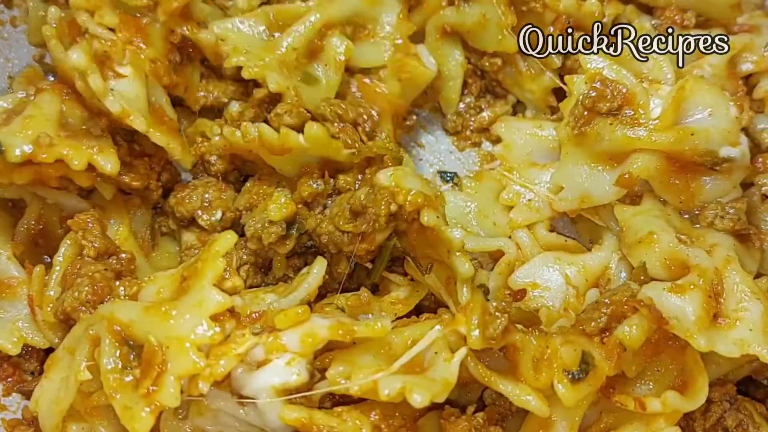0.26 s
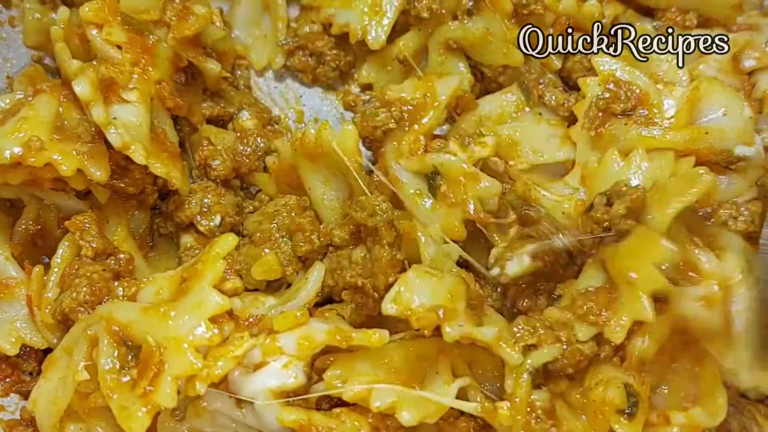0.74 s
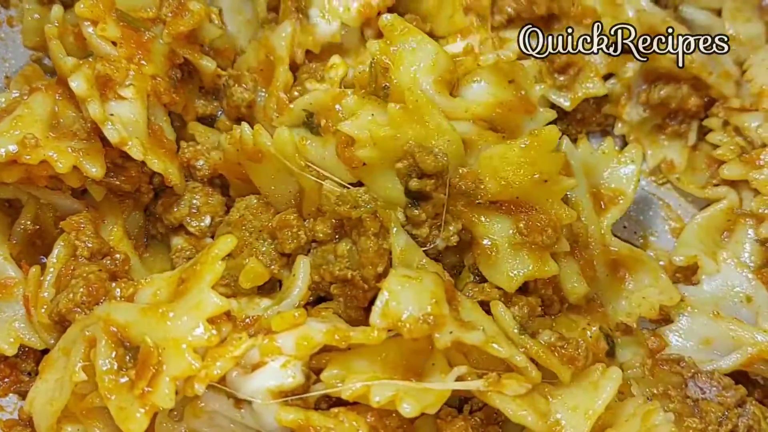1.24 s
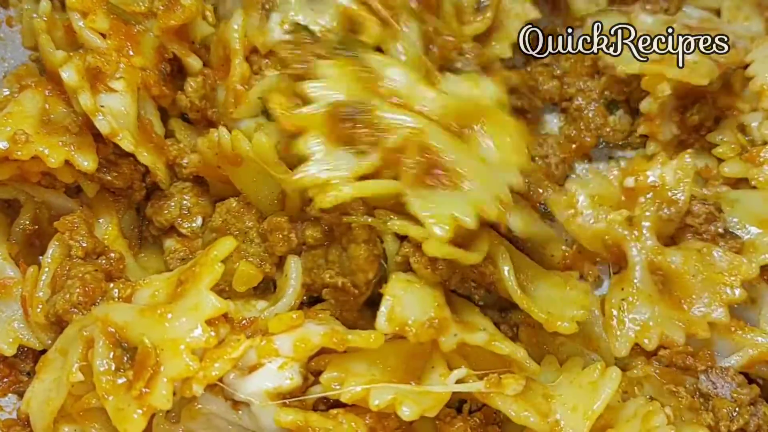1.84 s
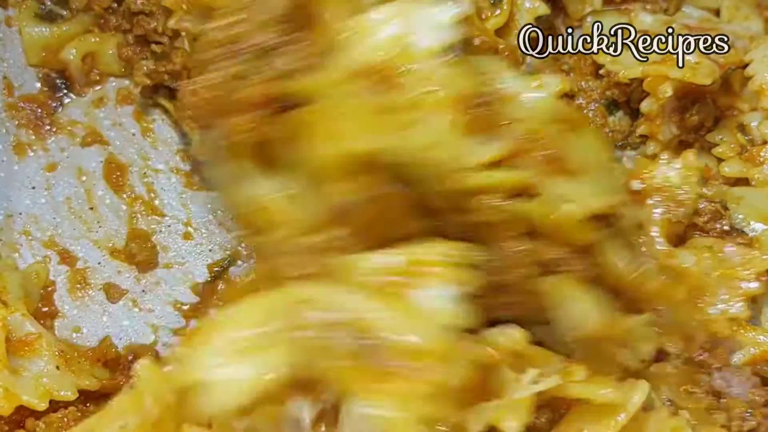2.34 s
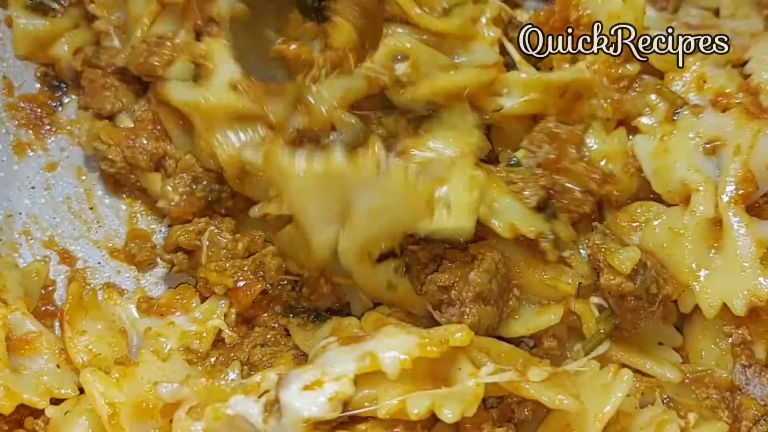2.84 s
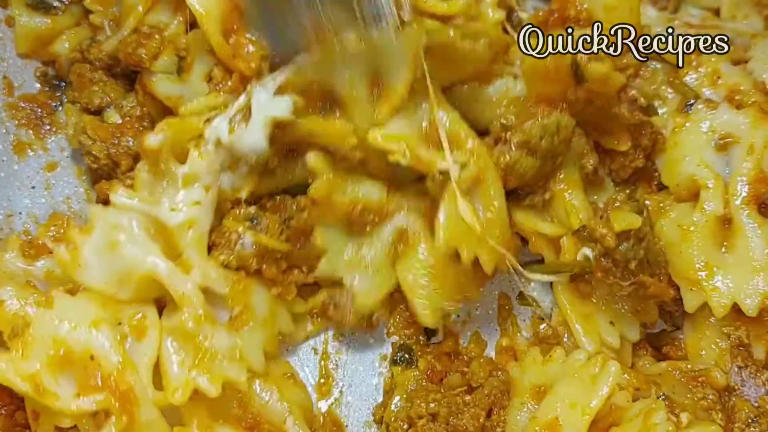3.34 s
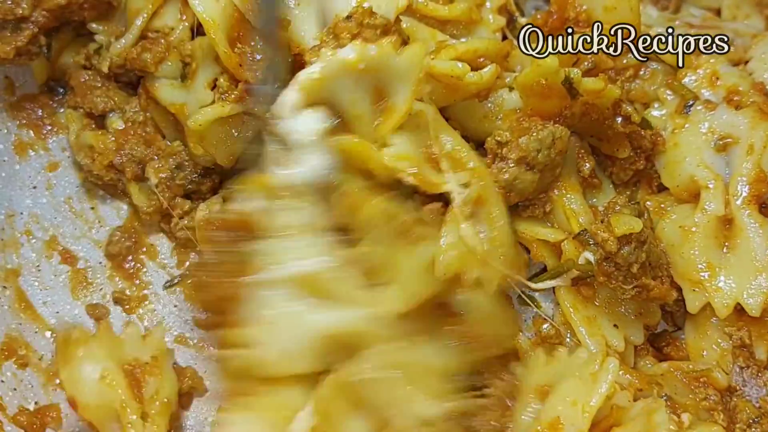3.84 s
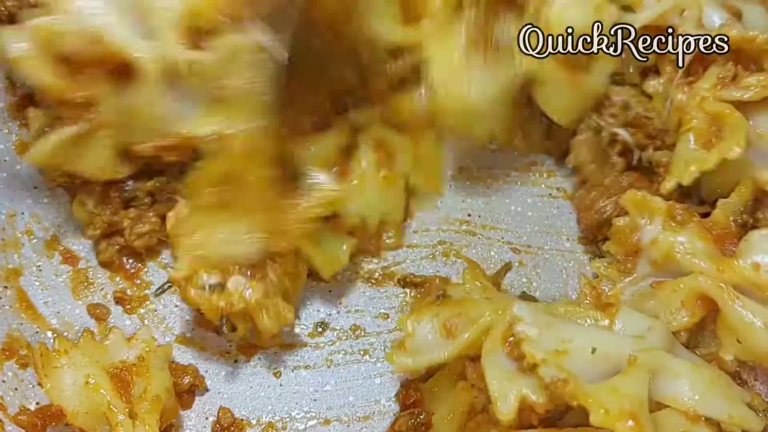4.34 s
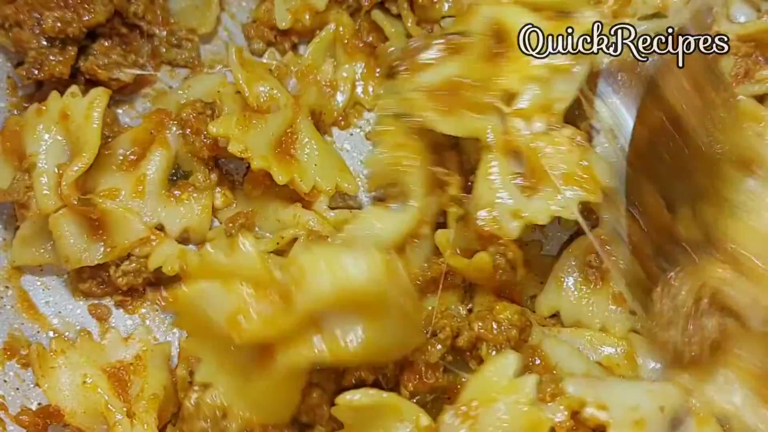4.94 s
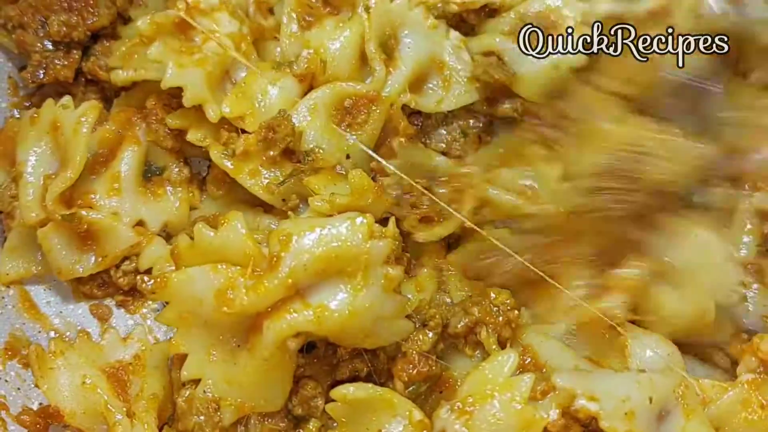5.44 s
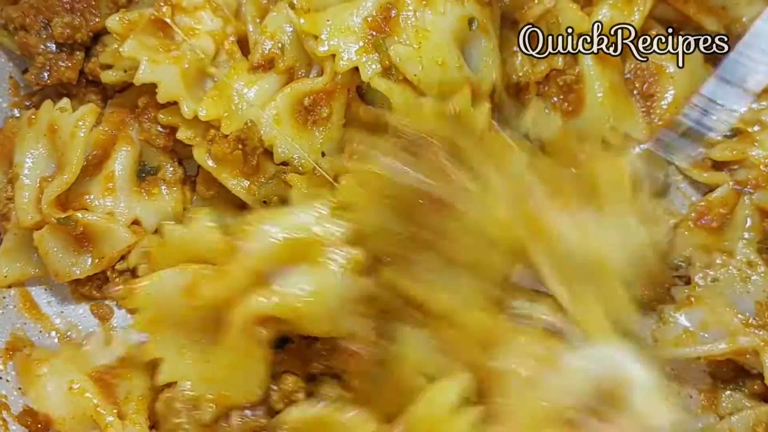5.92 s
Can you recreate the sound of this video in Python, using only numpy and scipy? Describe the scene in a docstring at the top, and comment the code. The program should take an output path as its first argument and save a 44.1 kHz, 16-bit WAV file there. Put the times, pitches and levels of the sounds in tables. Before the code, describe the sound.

Close wet crackling of saucy pasta being stirred, with a few sharp spoon knocks on the pan and birds chirping outside early on.

```python
"""A kitchen, stereo microphone close to a pan where a spoon turns pasta in thick sauce. From the start
the sauce crackles and smacks as tiny bubbles tear open; beyond the open window birds call over insects and
traffic, and a vehicle drones away by 2 s. The spoon knocks the pan ringing at 0.9 s, scrapes and knocks
at 2.2 s, then scrapes lightly. Thin chirps follow at 3 s, a last knock at 4.7 s and more bird calls,
before the sound fades out quickly at 5.6 s."""
import sys
import numpy as np
from scipy import signal
from scipy.fft import rfft, irfft, next_fast_len
from scipy.io import wavfile
from scipy.ndimage import map_coordinates

SR = 44100
rng = np.random.default_rng(int(sys.argv[2]) if len(sys.argv) > 2 else 0)


def digitize_waveform(pressure):
    """Quantize a signal to 16-bit integers and store it at the path in sys.argv[1].

    Rows of a 2-D input are taken as channels; values are limited to [-1, 1].
    """
    field = np.atleast_2d(pressure).T
    bounded = np.clip(field, -1, 1)
    quanta = np.round(bounded * 32767).astype(np.int16)
    wavfile.write(sys.argv[1], SR, quanta)


N = 272538

# Turns of the spoon, close up: (start [s], length [s], crackle [dB], slosh [dB])
STIRS = [(0, 0.12, -62, -77.5), (0.58, .28, -71, -89), (1.335, 0.1, -63, -80), (1.648, 0.14, -63.5, -67),
         (2.226, 0.16, -69.5, -64), (2.643, 0.28, -65.5, -66.5), (3.172, 0.15, -67.5, -71),
         (3.708, 0.38, -72, -87.5), (4.168, 0.25, -66.5, -66.5), (4.634, 0.035, -68.5, -80),
         (4.776, 0.09, -70.5, -66.5), (5.066, 0.13, -69.5, -64.5), (5.475, 0.047, -58, -55.5)]
# Sauce letting go of spoon and pasta: (time [s], level [dB], pitch [Hz], left over right [dB])
SMACKS = [(0.0276, -32.5, 11600, -1), (.0613, -33.5, 8800, -1), (.1391, -38, 11600, 5),
          (.1565, -42.5, 14000, -4), (.1695, -43, 15000, -2), (.188, -39, 11140, 4),
          (.1947, -38, 3500, 4.5), (0.4806, -38, 12010, 2), (.831, -46.5, 8650, 0.5),
          (.8895, -36, 8900, -0.5), (.9767, -39.5, 10500, 6.5), (1.373, -39.5, 9100, 3.5),
          (1.441, -35.5, 5130, 1), (1.4535, -35.5, 11200, 9), (1.6536, -38, 10500, 1),
          (1.6775, -42.5, 11500, 9), (1.771, -37, 12100, 7), (2.1215, -26.5, 10740, 6),
          (2.2374, -38, 12700, 11.5), (2.2798, -39.5, 11330, 10), (2.357, -40.5, 13700, 4),
          (2.372, -42.5, 3987, 1), (2.4182, -39, 11540, 3), (2.4643, -41, 11960, -3.5),
          (2.5047, -44.5, 10100, 2), (2.5222, -42, 12400, -8), (2.6379, -46, 10700, -5),
          (2.663, -40, 14900, -8.5), (2.6743, -38.5, 3600, 3), (2.711, -40.5, 2450, 4),
          (2.735, -39, 4560, 8), (2.766, -45, 2570, 3), (2.8087, -39.5, 5000, -2),
          (3.0946, -45, 14200, 4.5), (3.1819, -42, 3500, 9), (3.188, -40, 12800, 9),
          (3.2313, -42.5, 3870, 9), (3.2555, -43.5, 15280, 8.5), (3.2864, -43.5, 12600, 4),
          (3.3714, -45.5, 10200, 10), (3.598, -50, 3200, 10), (3.7412, -43.5, 13200, 4),
          (3.8611, -43.5, 11290, 0), (3.929, -45, 10800, 2), (3.9853, -45.5, 9700, 5.5),
          (4.0968, -37.5, 11300, 6), (4.153, -43.5, 15000, -1.5), (4.162, -42, 12600, -4.5),
          (4.2587, -42, 11500, 0.5), (4.3345, -44.5, 3230, 10), (4.3963, -41, 14580, 7.5),
          (4.6544, -39, 11000, -4), (4.6555, -45.5, 2700, 4), (4.7072, -40.5, 15500, 7),
          (4.807, -43, 14900, 7), (4.851, -48, 3150, 8), (4.8589, -38.5, 7700, -3),
          (5.017, -47, 10400, 0.5), (5.076, -41.5, 5040, 2), (5.0818, -39.5, 11400, -2.5),
          (5.1103, -40.5, 11800, 0.5), (5.1552, -45, 12400, -4), (5.1835, -42.5, 2470, 3),
          (5.399, -48, 9000, 2), (5.468, -49.5, 10700, -2), (5.4835, -43, 2580, -5), (5.4955, -42, 2490, 6),
          (5.5182, -41, 3430, -2), (5.545, -42, 11300, 7), (5.6029, -46.5, 11370, 4.5)]
def sauce():
    """Stirred sauce crackles and sloshes, never quite at rest; each smack leaves a spray of crackle."""
    rest_db, spray_db, spray_t60 = -79.5, -12, .034
    motion = np.array([stir(s, length) for s, length, _, _ in STIRS])
    crackle, slosh = amp(np.array(STIRS)[:, 2:]).T @ motion
    kicks = np.zeros(N)
    for s, db, _, _ in SMACKS:
        kicks[round(s * SR)] = amp(db + spray_db)
    crackle += amp(rest_db) + signal.lfilter([1], [1, -amp(-60 / spray_t60 / SR)], kicks)
    close = crackle * fizz(12300, spread=.57, uneven_db=4.5, count=9000)
    close += slosh * fizz(3020, spread=.49, uneven_db=3.5, count=6000)
    close += bubbles(*np.transpose(SMACKS), cycles=1.2)
    return close + amp(-12) * from_pan(close[0], lag_s=.0049, wet_db=8)


def stir(start, length, rise_s=.0073, t60=.12):
    """The sauce's motion in one turn: a quick rise, a hold, a decay."""
    t = np.arange(N) / SR - start
    return np.clip(1 + t / rise_s, 0, 1) * amp(-60 * np.clip(t - length, 0, 9) / t60)


def fizz(hz, spread, uneven_db, count):
    """A dense swarm of tiny bubbles, rms 1."""
    when, size = rng.random((count, 2)).T
    detune, side = rng.standard_normal((count, 2)).T
    pitch = np.clip(hz * np.exp(spread * detune), 800, 16000)
    return unit(bubbles(when * N / SR, -uneven_db * np.log(size), pitch, 3 + 3 * side, cycles=.54))


def bubbles(s, db, hz, left_db, cycles):
    """Bubbles tearing open: sines that swell and die in a few cycles, a little later on the right."""
    samples = np.arange(160)
    turns = samples / SR * hz[:, None]
    wave = amp(db)[:, None] * np.sin(2 * np.pi * turns) * turns / cycles * np.exp(1 - turns / cycles)
    ports = []
    for side, late in (1, 0), (-1, rng.random(len(s)) * 24):
        at = np.round(s * SR + late).astype(int)[:, None] + samples
        panned = wave * amp(side * left_db / 2)[:, None]
        ports.append(np.bincount(at.ravel(), panned.ravel(), N)[:N])
    return np.array(ports)


# Spoon on pan, with its bounces: (time [s], strength [dB], low-mode gain [dB], crack gain [dB])
KNOCKS = [(0.906, -5.5, -1, -19.5), (.9125, -11, -6, -25), (.919, -13.5, 5, -23), (2.1768, -23, 5.5, -10),
          (2.212, -32.5, 9, -7), (4.7272, -18, 0, -14.5), (4.7322, -16, -1.5, -16.5),
          (4.7348, -15.5, -5.5, -27)]
# The pan's modes: (frequency [Hz], gain [dB], t60 [s])
PAN_MODES = [(574, -20, 0.069), (747, -16.5, 0.031), (860, -16, 0.0251), (1010, -10.5, 0.019),
             (1100, -13.5, 0.037), (1273, -8.5, 0.035), (1532, -11.5, .03), (1700, -10, 0.019),
             (1940, -3, 0.035), (2087, 3.5, 0.011), (2604, -13, .025), (3000, -14.5, 0.038),
             (3860, -12, 0.012), (4680, -18, 0.018), (5220, -13, 0.011), (6415, -24, .03),
             (7630, -14, 0.0087)]
def knocks(low_hz=1600, crack_t60=.032, rise_s=.00099):
    """Each knock rings the pan's modes over a crack of noise."""
    x, t = np.zeros(N + SR), np.arange(SR // 2) / SR
    for s, db, low_db, crack_db in KNOCKS:
        ring = sum(amp(level + low_db * (hz < low_hz) + rng.normal(0, 1.95) - 60 * t / t60)
                   * np.sin(2 * np.pi * hz * t) for hz, level, t60 in PAN_MODES)
        crack = amp(crack_db - 60 * t / crack_t60) * rng.standard_normal(len(t))
        x[round(s * SR):][:len(t)] += amp(db) * (ring + crack) * (1 - np.exp(-t / rise_s))
    return x[:N]


# Spoon along the pan, one curve a stroke: (time [s], pressure [dB])
STROKES = [
    [(2.116, -54.5), (2.145, -37), (2.162, -33.5), (2.174, -40.5), (2.198, -40.5), (2.212, -31),
     (2.222, -36), (2.236, -59), (2.3, -76)],
    [(2.8, -73.5), (2.83, -59), (2.848, -54.5), (2.87, -55.5), (2.945, -67), (2.97, -72)],
]
# What each stroke shakes out of the pan: (starting ring gain [dB], thud gain [dB])
STROKE_GAINS = [(-22, -11.5), (-30.5, 11.5)]
# The rasp's spectrum: (frequency [Hz], gain [dB])
RASP = [(410, -40), (700, -12), (1000, -9), (1090, -4.5), (1980, -2), (2330, -2), (4120, -10.5),
        (5540, -20.5), (8000, -16), (10400, -38), (17600, -120)]
def scrapes(ring_db_per_s=258, dull_db_per_s=199):
    """Dense grit shakes the loaded pan; as the spoon digs in, the grit dulls and the pan rings more."""
    x = np.zeros(N)
    grit = rng.standard_normal(N) * amp(1.5 * wobble(180))
    shake = lambda level, colour: filtered(level * grit, colour) / np.std(filtered(grit, colour))
    for stroke, (ring_db, thud_db) in zip(STROKES, STROKE_GAINS):
        db, gate = curves(stroke)
        push = gate * amp(db)
        dig_s = np.clip(np.arange(N) / SR - stroke[0][0], 0, .09)
        rasp = shake(push, spectrum(RASP))
        ring = shake(push * amp(ring_db + ring_db_per_s * dig_s), resonances([(571.4, 14, 0)]))
        thud = shake(push * amp(thud_db), lambda f: resonances([(343, 266, 0)])(f) ** 2)
        crisp = shake(push * amp(2.5 - dull_db_per_s * dig_s), resonances([(10860, 18000, 0)]))
        x += rasp + ring + thud + crisp
    return x


# Sound from the pan, louder in the microphone's left port at some pitches: (frequency [Hz], left over right
# [dB])
PAN_PORT_BALANCE = [(500, 1), (1200, 3.5), (2000, 10.5), (3300, 5.5), (10000, 4)]
# Kitchen walls: (frequency [Hz], t60 [s])
KITCHEN_DECAY = [(400, 0.52), (2000, 0.23), (6000, 0.29), (14000, 0.3)]
def from_pan(x, lag_s, wet_db):
    """The short path from pan to microphone, with the kitchen's reverberation."""
    return microphone(x, PAN_PORT_BALANCE, lag_s, KITCHEN_DECAY, wet_db)


# Calls far off in the yard:
# (start [s], length [s], first pitch [Hz], last pitch [Hz], level [dB], decay [dB], pitch jitter [ratio])
CALLS = [(0, 0.07, 3330, 3400, -38.5, 5, 0.03), (0, 0.46, 4160, 3990, -50.5, 21, 0.02),
         (.002, 0.048, 2553, 2606, -26.5, 15.5, 0.01), (0.049, 0.057, 3378, 3670, -31, 10, 0.03),
         (0.081, 0.053, 2300, 2010, -31.5, 14.5, 0.01), (0.097, 0.27, 3470, 3500, -50.5, 11, 0.02),
         (.115, 0.046, 3682, 3790, -39.5, 3.5, .009), (0.118, 0.028, 1970, 1950, -45, 6, 0),
         (.18, 0.064, 2157, 2125, -42.5, 0.5, 0.02), (0.223, 0.048, 2325, 2510, -41, 10, 0.08),
         (0.222, 0.12, 2023, 2000, -44.5, 23, .055), (0.238, 0.22, 2490, 2530, -52, 16, .055),
         (0.488, .12, 2990, 3485, -42.5, -4, 0.03), (0.571, 0.065, 3726, 3874, -40.5, 1, 0),
         (.578, 0.051, 2720, 2465, -36.5, -2, 0.02), (0.614, 0.057, 3850, 3820, -27.5, 9.5, 0),
         (0.619, 0.044, 2230, 1770, -34, 10, 0.02), (.65, 0.29, 2800, 2900, -44.5, 11, 0.07),
         (.66, 0.23, 2024, 2100, -44.5, 8, 0.05), (0.696, 0.16, 3842, 3800, -37.5, 14.5, .009),
         (0.743, 0.042, 2550, 2646, -27.5, 3.5, 0.02), (1.01, 0.14, 7700, 8600, -67, 10, 0.06),
         (1.15, 0.19, 2554, 2514, -52, 0.5, 0.04), (1.189, .12, 2047, 2180, -55.5, -4, 0.08),
         (1.36, 0.064, 2090, 2080, -54.5, -1.5, 0.07), (1.375, 0.039, 2950, 2745, -49, 0, 0.07),
         (1.27, .18, 7200, 8250, -63, 6, 0.06), (1.334, 0.064, 2640, 2680, -38, 16.5, 0.02),
         (1.625, 0.066, 7550, 7950, -83, -17, 0), (2.921, 0.16, 7150, 7260, -65, 5.5, 0.01),
         (5.068, 0.04, 2090, 1926, -46, 6.5, 0.03), (5.09, 0.0427, 3310, 2690, -46, 2, 0),
         (5.1, .16, 1963, 1980, -61, 11, 0.03), (5.117, 0.063, 2610, 2500, -40, 9.5, 0.01),
         (5.209, 0.064, 3510, 2465, -46.5, -6.5, 0.01), (5.244, 0.24, 2930, 2790, -61, 11.5, 0.07),
         (5.29, 0.069, 1905, 2260, -38, 9, 0.02), (5.337, 0.13, 2008, 2050, -60.5, 5, 0.02),
         (5.55, 0.056, 1514, 1556, -65.5, 4.5, .009)]
# One quick chirp: (time [s], pitch [Hz], gain [dB])
CHIRP = [(0, 5450, 8), (.008, 5530, -3), (.014, 6290, 1), (0.023, 6660, -3), (.04, 6230, -14)]
# Its repeats: (time [s], level [dB])
CHIRP_REPEATS = [(3.004, -57), (3.095, -62), (3.184, -61), (3.274, -59.5), (3.385, -62), (3.471, -63)]
# Sound through the window, louder in the microphone's left port at some pitches: (frequency [Hz], left over
# right [dB])
WINDOW_PORT_BALANCE = [(2300, 4.2), (3300, 1.4), (6000, 4)]
# Yard walls: (frequency [Hz], t60 [s])
YARD_DECAY = [(1500, 0.23), (4000, 0.3), (8000, 0.19)]
def birds():
    """Distant gliding notes, smeared by the yard; the less steady the pitch, the raspier the call."""
    song = np.zeros(N)
    tremble, flutter = wobble(260), amp(2.77 * wobble(90))

    def sing(s, hz, level, jitter):
        on = slice(round(s * SR), round(s * SR) + len(hz))
        phase = 2 * np.pi * np.cumsum(hz * (1 + jitter * tremble[on])) / SR
        song[on] += flutter[on] * level * np.sqrt(2) * np.sin(phase)

    for s, length, first_hz, last_hz, db, decay_db, jitter in CALLS:
        t = np.arange(round(length * SR)) / SR
        swell_db = 12 * np.clip(1 - t / .014, 0, 1)
        drop_db = 13.5 * np.clip(1 - (length - t) / .01425, 0, 1)
        gate = np.clip(np.minimum(t, length - t) / .0056, 0, 1)
        level = gate * amp(db - decay_db * t / length - swell_db - drop_db)
        sing(s, first_hz + (last_hz - first_hz) * t / length, level, jitter)
    hz, shape_db, gate = (c[:round(CHIRP[-1][0] * SR)] for c in curves(CHIRP))
    for s, db in CHIRP_REPEATS:
        sing(s, hz, gate * amp(db + shape_db), jitter=.08 * wobble(1200)[:len(hz)])
    return microphone(song, WINDOW_PORT_BALANCE, lag_s=.000496, decay=YARD_DECAY, wet_db=-4.5)


# A vehicle leaving, out on the street: (time [s], fifth order [Hz], level [dB])
ENGINE = [(0, 153, -31.5), (.43, 157, -35), (.88, 157, -43.5), (.97, 139, -46.5), (1.16, 147, -46.5),
          (1.35, 138, -44), (1.58, 140, -55.5), (1.7, 141, -44.5), (1.82, 142, -55), (2.1, 138, -60)]
def engine():
    """A strong fifth engine order drones over its weaker neighbours."""
    hz, db, gate = curves(ENGINE)
    turn = 2 * np.pi * np.cumsum(hz) / SR / 5
    weaker = sum(amp(level + 2.6 * wobble(5.2)) * np.sin(order * turn)
                 for order, level in ((2, -14.5), (8, -15), (11, -19.5), (14, -22.5)))
    return gate * np.sqrt(2) * amp(db + 2.5 * wobble(12)) * (np.sin(5 * turn) + weaker)


# Road rumble and far-off tyres, through the window: (time [s], level [dB])
ROAD_LEVEL = [(0, -35.5), (.4, -39), (.8, -43.5), (1.4, -53.5), (2.4, -62.5), (2.9, -57), (3.2, -63.5),
              (4.3, -56), (4.8, -64), (5.4, -58.5)]
TYRE_LEVEL = [(0, -55), (.48, -65.5), (.93, -54.5), (1.28, -67.5), (2.6, -69.5), (3.6, -66), (4.2, -70),
              (5.4, -66.5)]
# Spectra of road, tyres and the town behind: (frequency [Hz], gain [dB])
ROAD_COLOUR = [(15, -45.5), (25, -26), (54, -5), (102, -5), (156, 2.5), (205, -20.5), (262, -7),
               (362, -13.5), (560, -19), (738, -36), (1200, -40.5), (1560, -65.5), (2640, -120)]
TYRE_COLOUR = [(400, -21.5), (700, -4), (1300, -4), (2000, 1.5), (3300, -5), (4500, -12.5), (6000, -37.5)]
TOWN_COLOUR = [(15, -39.5), (30, -14.5), (55, -1), (120, 0), (200, -12), (400, -28), (800, -120)]
def traffic():
    """The road rumbles and tyres hiss over the steady rumble of the town."""
    road = rush(curves(ROAD_LEVEL)[0] + 4.2 * wobble(9), spectrum(ROAD_COLOUR), left_db=-1.6)
    tyres = rush(curves(TYRE_LEVEL)[0] + 1.2 * wobble(6.2), spectrum(TYRE_COLOUR), left_db=7)
    town = rush(-55 + 1.1 * wobble(2.4), spectrum(TOWN_COLOUR), left_db=0)
    return road + tyres + town


# Insects outside the window: (time [s], level [dB])
INSECT_LEVEL = [(0, -50.5), (.35, -56), (.8, -54), (1.74, -53.5), (2.2, -75), (2.72, -75), (2.9, -66.5),
                (3.5, -69.5), (3.8, -78), (5.4, -75.5)]
# Their bands, a filter passed twice: (centre [Hz], width [Hz], gain [dB])
INSECT_BANDS = [(3930, 270, -5.5), (5030, 400, -5), (5596, 140, 3), (6040, 980, -7), (7360, 600, -7)]
def insects():
    """A chorus blurred into flickering bands of high noise."""
    db = curves(INSECT_LEVEL)[0] + 2 * wobble(30)
    return rush(db, lambda f: resonances(INSECT_BANDS)(f) ** 2, left_db=5)


# Kitchen air around the microphone: (frequency [Hz], gain [dB])
AIR_COLOUR = [(120, -36.5), (200, -5), (249, 0.5), (366, -17.5), (548, -10), (1160, -37.5), (1940, -13.5),
              (2380, -29.5), (3970, -40.5), (4520, -41.5), (5730, -31), (6170, -24), (7270, -30.5),
              (16000, -35.5)]
# Faint steady tones: (frequency [Hz], level [dB])
HUM = [(236.9, -68), (409.1, -73), (549.1, -73), (608.3, -71.5)]
def room_tone():
    """Still air and a faint hum, both wavering slightly."""
    t = np.arange(N) / SR
    air = rush(-62.5 + 2.7 * wobble(4), spectrum(AIR_COLOUR), left_db=6)
    return air + sum(amp(db + .69 * wobble(6.4)) * np.sin(2 * np.pi * hz * t) for hz, db in HUM)


# Diffuse sound at the microphone: (frequency [Hz], left-right correlation [0-1])
LIKENESS = [(60, 0.71), (150, 0.66), (400, 0.43), (1000, .05), (15000, .02)]
def rush(db, colour, left_db):
    """Coloured stereo noise, most alike at the two ports in the bass."""
    angle = lambda hz: np.arccos(along(LIKENESS, hz)) / 2
    split = lambda hz: colour(hz) * [np.cos(angle(hz)), np.sin(angle(hz))]
    mid, side = filtered(rng.standard_normal((2, N)), split)
    return amp(db + [[left_db / 2], [-left_db / 2]]) * unit(np.array([mid + side, mid - side]))


def microphone(x, left, lag_s, decay, wet_db):
    """Two ports: the right one hears the sound later and softer; then the walls answer."""
    lean = lambda hz: amp(along(left, hz) / 2)
    ports = filtered(x, lambda hz: np.array([lean(hz), np.exp(-2j * np.pi * hz * lag_s) / lean(hz)]))
    hz, t, noise = signal.stft(rng.standard_normal((2, SR // 2)), SR, nperseg=256)
    tail = signal.istft(noise * amp(-60 * t / along(decay, hz)[:, None]), SR, nperseg=256)[1]
    return ports + amp(wet_db) * signal.fftconvolve(ports, tail / np.linalg.norm(tail[0]), axes=1)[:, :N]


def amp(db):
    return 10 ** (np.asarray(db) / 20)


def unit(x):
    return x / np.sqrt(np.mean(x ** 2) + 1e-20)


def along(points, hz):
    """(Hz, value) points on a log axis."""
    f, v = np.transpose(points)
    return np.interp(np.log(hz + 1), np.log(f + 1), v)


def spectrum(points):
    """Response through (Hz, dB) points."""
    return lambda f: amp(along(points, f))


def resonances(modes):
    """Causal response of (Hz, width, dB) modes."""
    return lambda f: sum((-1) ** k * amp(db) * 1j * f * width / (hz * hz - f * f + 1j * f * width)
                         for k, (hz, width, db) in enumerate(modes))


def curves(rows):
    """One value per sample for each column, and a gate open while the rows last."""
    s, *cols = np.transpose(rows)
    t = np.arange(N) / SR
    return [np.interp(t, s, c) for c in cols] + [np.clip(np.minimum(t - s[0], s[-1] - t) / .006, 0, 1)]


def wobble(rate):
    """A smooth random curve, rate knots a second."""
    return map_coordinates(rng.standard_normal(int(N * rate / SR) + 4), [np.arange(N) * rate / SR])


def filtered(x, response):
    """x times a complex response of frequency."""
    m = next_fast_len(N + SR // 2)
    return irfft(rfft(x, m) * response(np.fft.rfftfreq(m, 1 / SR)), m)[..., :N]


def scene():
    """The pan up close, the yard and street beyond the window."""
    background = birds() + engine() + traffic() + insects() + room_tone()
    spoon = from_pan(knocks() + scrapes(), lag_s=.00019, wet_db=-8.5)
    return sauce() + spoon + background


# The closing fade: (time [s], level [dB])
FADE = [(5.622, 0.5), (5.635, -38.5), (5.72, -64), (5.8, -120)]
def record(dry, ceiling=.93, top_hz=15900):
    """The input saturates softly on the loudest knock; the sound fades out; the top treble is cut."""
    soft = dry / (1 + np.abs(dry / ceiling) ** 4) ** .25
    return filtered(soft * amp(curves(FADE)[0]), lambda hz: hz < top_hz)


dry = scene()
out = record(dry)
digitize_waveform(out)
```